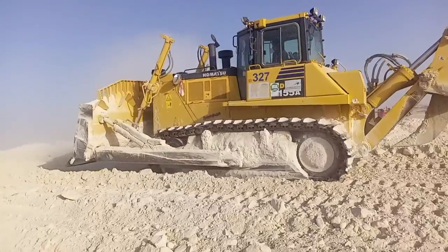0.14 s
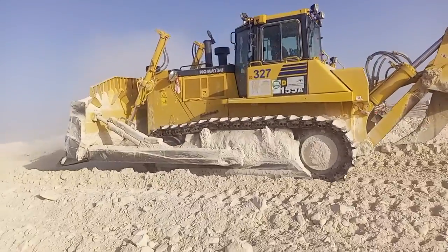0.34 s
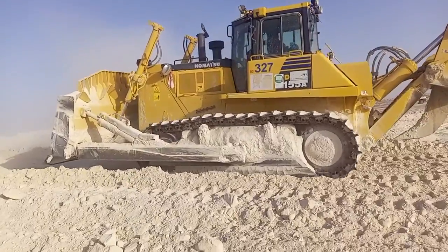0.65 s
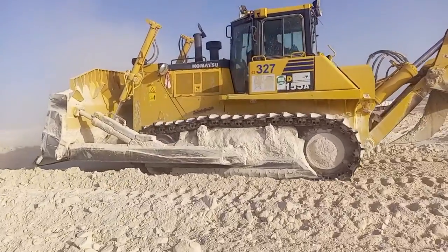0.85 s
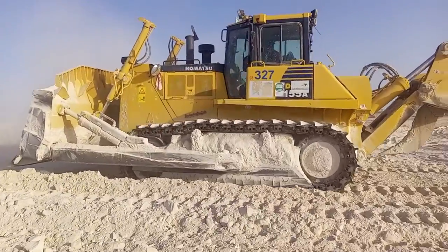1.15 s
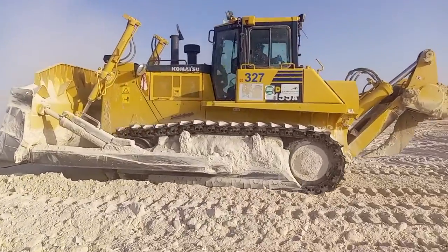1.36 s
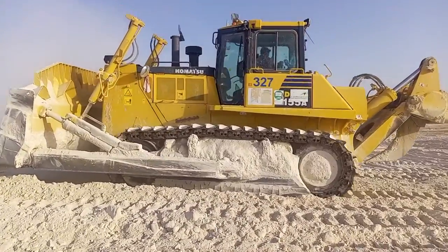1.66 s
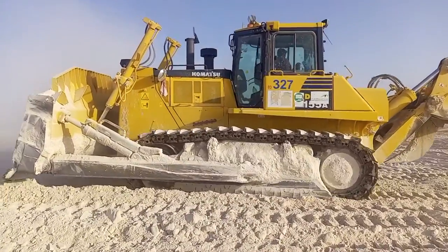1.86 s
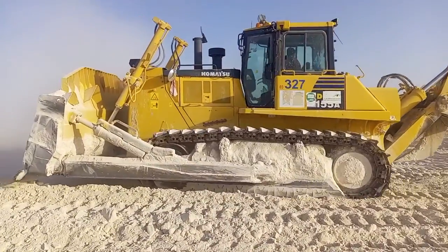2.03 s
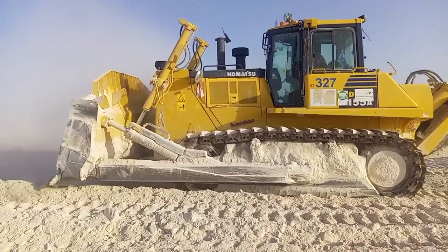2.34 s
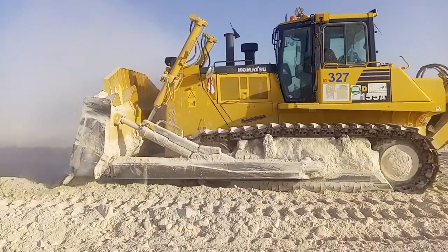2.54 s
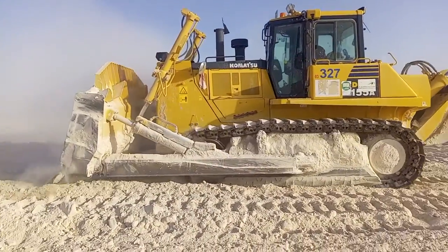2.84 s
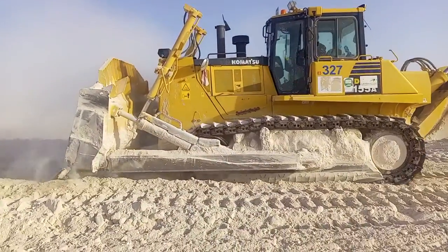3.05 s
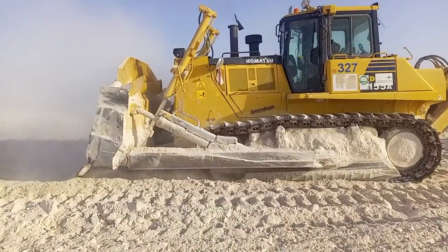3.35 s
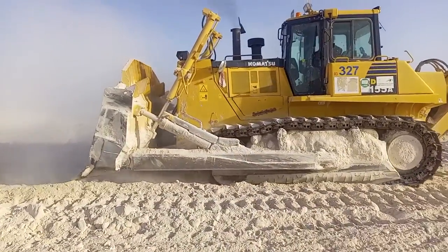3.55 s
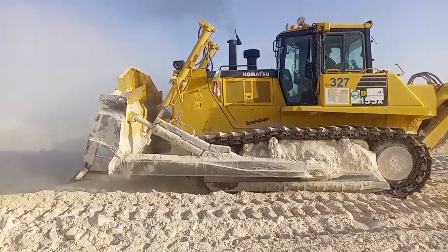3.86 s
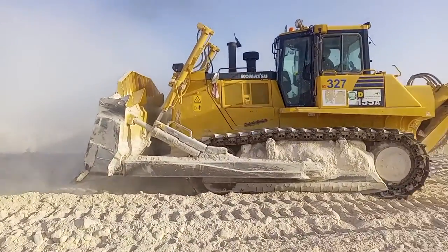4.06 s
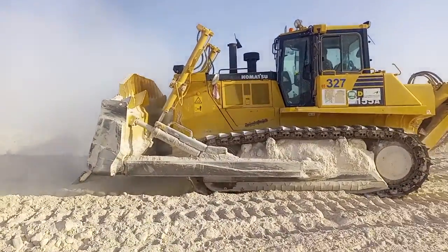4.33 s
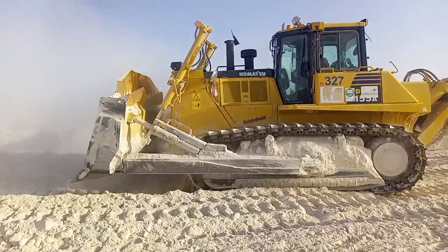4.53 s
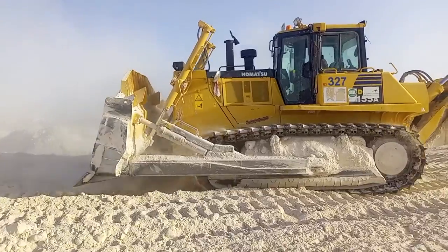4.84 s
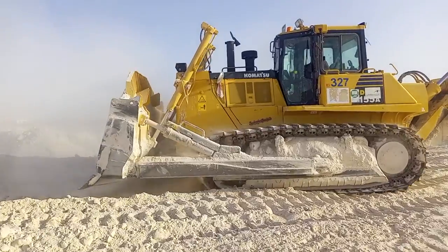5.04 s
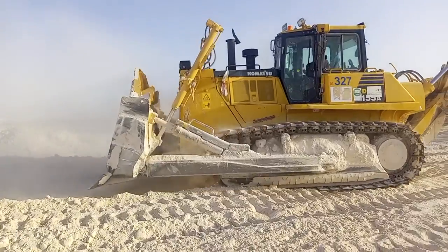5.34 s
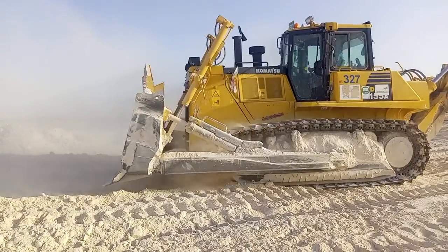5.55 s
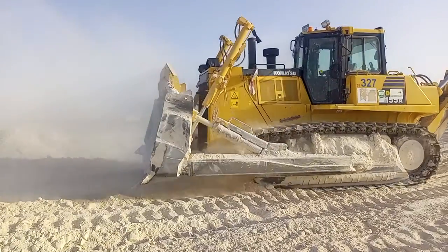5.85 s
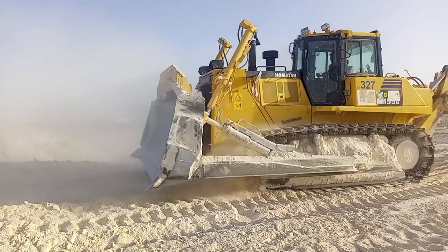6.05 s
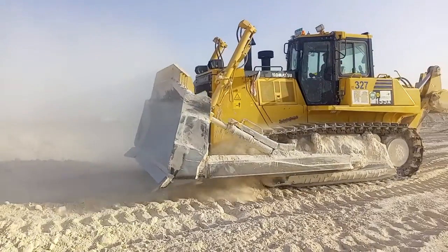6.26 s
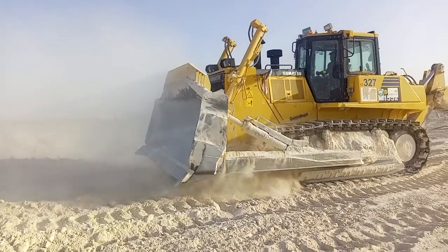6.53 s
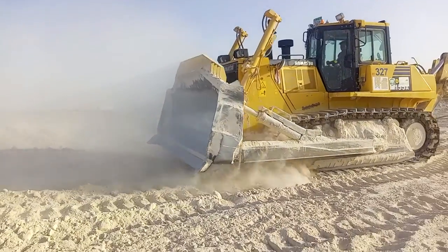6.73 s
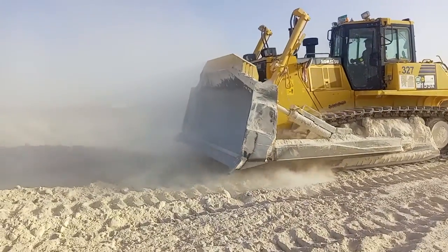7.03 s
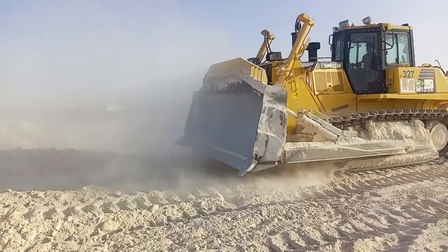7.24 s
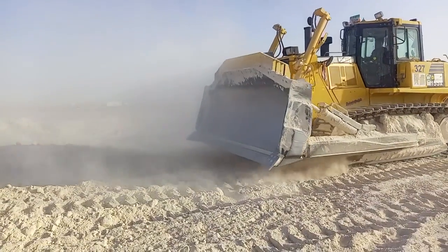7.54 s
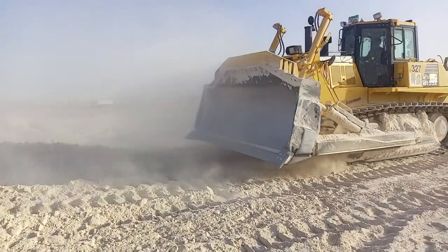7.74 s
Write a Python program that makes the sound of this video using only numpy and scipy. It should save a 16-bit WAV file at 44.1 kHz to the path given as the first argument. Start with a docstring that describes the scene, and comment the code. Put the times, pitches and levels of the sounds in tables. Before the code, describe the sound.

A bulldozer reverses nearby, steel tracks clanking and squeaking over a humming diesel engine, with some wind thumping the microphone.

```python
"""Steel track shoes clank and squeak over the sprocket as a bulldozer reverses on loose soil nearby.
Each shoe scrapes and rings; the track frame knocks, pins chirp as they slip and dry bearings squeal.
Underneath, grit grinds in the rollers, fan air and dust hiss, and the diesel hums and roars, its turbo
whistling once. Low thumps come from the tracks early on, from wind on the small microphone later."""
import sys
import numpy as np
from scipy import signal
from scipy.fft import rfft, irfft
from scipy.io import wavfile
from scipy.ndimage import uniform_filter1d

SR = 44100
rng = np.random.default_rng(int(sys.argv[2]) if len(sys.argv) > 2 else 0)


def file_out(sig):
    """Save sig as 16-bit WAV at sys.argv[1]."""
    # one column per channel
    cols = np.atleast_2d(sig).T
    # limit, then scale
    lim = np.clip(cols, -1, 1)
    pcm = np.round(lim * 32767).astype(np.int16)
    wavfile.write(sys.argv[1], SR, pcm)


N = 347949


def gain_of(db):
    return 10 ** (np.asarray(db) / 20)


def unit_rms(x):
    return x / np.sqrt(np.mean(x ** 2) + 1e-20)


def curves(rows, t):
    """Columns of a (time_s, value, ...) table, interpolated at t."""
    time_s, *columns = np.transpose(rows)
    return [np.interp(t, time_s, column) for column in columns]


def add(mix, start_s, sound):
    part = mix[max(round(start_s * SR), 0):][:len(sound)]
    part += sound[:len(part)]


def wander(size, width_hz):
    """Narrowband complex noise: wavering amplitude and phase."""
    pole, settle = np.exp(-np.pi * width_hz / SR), 2000
    white = rng.standard_normal((size + settle, 2)) @ [1, 1j]
    return signal.lfilter([1], np.poly([pole, pole]), white)[settle:] * (1 - pole) ** 1.5 * np.sqrt(2)


def tone(hz, size, width_hz, rough):
    """Sine, part steady and part wavering; rough (0-1) sets the blend."""
    carrier = np.exp(2j * np.pi * (np.cumsum(hz * np.ones(size)) / SR + rng.random()))
    return (carrier * (np.sqrt(1 - rough) + np.sqrt(rough) * wander(size, width_hz))).real


def envelope(t, hold_s, rise_s, t60_s):
    """Soft rise of at least 2 ms, hold, exponential fall."""
    attack = np.sin(np.pi / 2 * np.clip(t / max(rise_s, 0.002), 0, 1)) ** 2
    return attack * gain_of(-60 * np.maximum(t - rise_s - hold_s, 0) / t60_s)


def noise(magnitude, size, patchy_db):
    """Random short-time spectra of magnitude(hz, t), mottled by drifting patches."""
    hop = size // 4
    frames, hz = N // hop + 5, np.fft.rfftfreq(size, 1 / SR)
    real, imag, patches = rng.standard_normal((frames, len(hz), 3)).T
    patches = unit_rms(uniform_filter1d(uniform_filter1d(patches, size=3, axis=0), size=10, axis=1))
    mottle = gain_of(patchy_db * np.minimum(patches, 2))
    spectra = (real + 1j * imag) * mottle * magnitude(hz[:, None] + 1, np.arange(frames) * hop / SR)
    return signal.istft(spectra, nperseg=size, noverlap=size - hop)[1][:N]


def coloured(spectrum, patchy_db, size=1024):
    """Unit-RMS noise from (freq_hz, density_db) points."""
    freq_hz, density_db = np.transpose(spectrum)
    def magnitude(hz, t):
        return gain_of(np.interp(np.log(hz), np.log(freq_hz), density_db))
    return unit_rms(noise(magnitude, size, patchy_db))


def scraped(source, start_s, mode_hz, mode_db, width_hz, size):
    """A slice of source through steep resonances, at unit RMS."""
    detune = 2 * (np.fft.rfftfreq(size, 1 / SR) - mode_hz[:, None]) / width_hz[:, None]
    response = np.sum(gain_of(mode_db)[:, None] / (1 + detune ** 2), axis=0)
    force = np.resize(source[round(start_s * SR):], size)
    return unit_rms(irfft(rfft(force) * response, size))


def thump_spectrum(hz, thump_hz, rasp_db):
    """A low thump, a deep push below, a rasp above."""
    thump = 1 / (1 + (3.26 * np.log(hz / thump_hz)) ** 2) / (1 + (hz / 350) ** 4.1)
    push = 1 / (1 + (hz / 85) ** 21) / (1 + (55 / hz) ** 4.9)
    rasp = 1 / (1 + (250 / hz) ** 15) / (1 + (hz / 560) ** 4.38)
    bands = ((thump, 0), (push, -15), (rasp, rasp_db))
    return sum(gain_of(db) * band / np.linalg.norm(band) for band, db in bands)


# Low thumps (tracks before 4.5 s, wind after): crest_s, hold_s, level_db, thump_hz, rasp_db
LOW_THUMPS = [(0.145, 0.051, -38.5, 175, -9), (0.51, .08, -48.5, 115, 2), (0.975, 0.028, -38, 198, -10),
              (1.1, .2, -40, 116, -23), (1.366, .05, -34, 146, -6), (1.617, 0.011, -38.5, 170, -4),
              (1.996, 0.075, -33.5, 133, -34), (2.244, 0.08, -37.5, 222, -22), (2.5, 0.32, -50, 121, -18),
              (2.93, 0.031, -43, 123, -4), (3.11, .05, -38, 117, -13), (3.195, 0.049, -35, 150, -12.5),
              (4.324, .04, -41, 123, -20), (4.622, 0.065, -25.5, 128, -7), (4.706, 0.063, -29, 130, -29),
              (5.21, 0.051, -47, 190, -6), (5.301, .07, -28.5, 159, -11.5), (5.362, 0.054, -22, 208, -14.5),
              (5.492, 0.05, -23, 115, -5), (5.585, .03, -28, 121, -35), (5.644, .07, -30, 173, -48),
              (5.982, 0.025, -41, 166, -5), (6.08, 0.042, -41.5, 161, -27),
              (6.501, 0.047, -30.5, 173, -12.5), (6.585, 0.056, -30, 138, -7), (6.694, 0.028, -35, 135, -4),
              (6.763, 0.025, -29.5, 161, -8), (6.877, 0.087, -28, 145, -8.5), (7.0, 0.04, -21, 149, -22),
              (7.229, 0.042, -21, 135, -11), (7.29, 0.06, -38.5, 140, 0), (7.36, 0.033, -37.5, 170, -1),
              (7.481, 0.14, -30, 131, 0), (7.678, 0.055, -22.5, 146, -11.5), (7.805, 0.068, -22, 144, -7.5)]
def breeze_and_thumps(rise_s=0.033, fall_db_per_s=356):
    """A lumpy breeze under low thumps: from the tracks early on, from wind on the microphone later."""
    def magnitude(hz, t):
        lumps = unit_rms(uniform_filter1d(rng.standard_normal(len(t)), size=9))
        power = (gain_of(-54.5 + 3 * lumps) * thump_spectrum(hz, thump_hz=162, rasp_db=-6)) ** 2
        for crest_s, hold_s, level_db, thump_hz, rasp_db in LOW_THUMPS:
            swell = envelope(t - crest_s + rise_s, hold_s, rise_s, t60_s=60 / fall_db_per_s)
            power += (gain_of(level_db - 5) * swell * thump_spectrum(hz, thump_hz, rasp_db)) ** 2
        return np.sqrt(power)
    return noise(magnitude, size=1024, patchy_db=3)


# Hiss spectrum: freq_hz, density_db
HISS_SPECTRUM = [(2940, -40), (5000, -20), (5220, 0.5), (6600, -4.5), (8060, -12.5), (10700, -23.5),
                 (11500, -25), (13600, -20), (15100, -17), (16000, -12)]
# Hiss level: time_s, level_db
HISS_LEVEL = [(0.0, -77), (0.7, -64.5), (2.17, -66.5), (3.87, -59), (4.5, -65.5), (4.96, -60),
              (5.32, -67.5), (5.65, -60.5), (6.0, -60.5), (6.31, -61), (6.48, -69), (6.77, -64.5),
              (7.12, -67), (7.54, -71), (7.89, -61)]
def hiss(t):
    """Fan air and sliding dust: smooth high noise."""
    level_db, = curves(HISS_LEVEL, t)
    return gain_of(level_db + 5) * coloured(HISS_SPECTRUM, patchy_db=1.5, size=512)


# Turbo whistle: time_s, pitch_hz, level_db
TURBO = [(3.2, 7700, -73), (3.45, 8150, -70), (3.7, 9000, -69), (3.95, 9750, -68), (4.3, 9980, -69),
         (4.7, 9600, -70), (5.2, 8800, -73)]
def turbo(t, fade_s=0.089):
    """The turbo spools up and eases off once: a narrow gliding band of noise."""
    pitch_hz, level_db = curves(TURBO, t)
    fade = np.clip(np.minimum(t - TURBO[0][0], TURBO[-1][0] - t) / fade_s, 0, 1)
    return gain_of(level_db + 1.5) * fade * tone(pitch_hz, N, width_hz=200, rough=1)


# Cylinder firing: time_s, firing_hz, level_db, rough_fraction
FIRING = [(0, 84.5, -57, 0.8), (1.2, 87, -52.5, 0.93), (2.0, 87.64, -49.5, 0.6), (2.9, 86.8, -44.5, 0.76),
          (3.2, 84, -41.5, 0.5), (3.6, 87.5, -43, 0.5), (4.0, 95.8, -51.5, 0.6), (4.4, 97, -53.5, 0.8),
          (5.0, 91.6, -65, 0.5), (5.9, 77.74, -56, 0.91), (7.89, 78.8, -57, 0.6)]
# Exhaust spectrum: freq_hz, density_db
ROAR_SPECTRUM = [(18, -44), (30, -26), (81, 1), (190, 1.5), (373, 0), (467, -4), (584, -24), (717, -4),
                 (802, -2), (1140, -10), (1260, -7), (1380, -26.5), (1690, -8.5), (2120, -21.5),
                 (2600, -19.5), (3380, -76), (5720, -120)]
# Machine effort, for diesel and grind: time_s, roar_db, grind_db
EFFORT = [(0.0, -46, -40.5), (0.5, -45, -47), (1.16, -47.5, -52.5), (2.09, -46, -54), (2.26, -43, -53),
          (2.52, -47, -48), (3.07, -44.5, -48), (3.91, -48.5, -49), (4.44, -48.5, -51.5),
          (4.81, -48.5, -46.5), (5.1, -45, -48), (5.43, -49, -54), (5.67, -52.5, -39), (6.04, -50, -49.5),
          (6.79, -51, -53.5), (7.12, -50, -45.5), (7.67, -51.5, -45), (7.89, -52, -47.5)]
def diesel(t):
    """Firing tone and its octave, plus exhaust roar throbbing at the firing rate."""
    firing_hz, level_db, rough = curves(FIRING, t)
    roar_db, _ = curves(EFFORT, t)
    hum = sum(gain_of(db) * tone(harmonic * firing_hz, N, width_hz=22, rough=rough)
              for harmonic, db in ((1, 3), (2, -8)))
    throb = 1 + 0.038 * np.cos(2 * np.pi * np.cumsum(firing_hz) / SR)
    roar = gain_of(roar_db + 0.5) * throb * coloured(ROAR_SPECTRUM, patchy_db=5.5)
    return gain_of(level_db) * hum + roar


# Track grind spectrum: freq_hz, density_db
GRIND_SPECTRUM = [(880, -74), (1500, 4), (1740, 6), (2100, -3), (2770, -5), (3010, 4.5), (3580, 6),
                  (3980, 6.5), (4450, 7), (4830, 12.5), (5210, 4), (6620, -0.5), (9000, -18.5),
                  (11700, -46), (19800, -120)]
def grind(t):
    """Grit between pins and rollers excites the steel in short streaks."""
    _, grind_db = curves(EFFORT, t)
    return gain_of(grind_db - 5) * coloured(GRIND_SPECTRUM, patchy_db=5)


# Bearing squeals: start_s, end_s, pitch_hz, level_db
SQUEALS = [(0.0, 0.29, 1770, -55), (0.1, 0.272, 3150, -46.5), (0.07, 0.315, 4310, -47.5),
           (0.0, 0.297, 4600, -55), (0.065, 0.3, 5640, -66), (0.0, 0.253, 3580, -53),
           (1.416, 1.69, 6900, -48), (1.749, 2.325, 6770, -59.5), (1.788, 2.093, 1740, -47.5),
           (1.919, 2.103, 1250, -52.5), (2.403, 2.537, 4350, -49), (3.145, 3.46, 1578, -46.5),
           (3.739, 3.903, 6360, -67), (3.9, 4.288, 1747, -53), (5.048, 5.325, 1530, -54),
           (5.591, 5.913, 1456, -60), (7.082, 7.92, 1560, -51), (7.439, 7.838, 4720, -47.5)]
def bearing_squeals():
    """Dry bearings stick and slip on one narrow mode, fading in and out."""
    out = np.zeros(N)
    for start_s, end_s, pitch_hz, level_db in SQUEALS:
        size = round((end_s - start_s) * SR)
        squeal = tone(pitch_hz, size, width_hz=55, rough=0.46)
        add(out, start_s, gain_of(level_db) * squeal * signal.windows.tukey(size, 0.4))
    return out


# Pin slips: time_s, level_db, pitch_hz
CHIRPS = [(.345, -40.5, 10200), (0.5591, -38, 7360), (.597, -47, 11600), (.627, -40, 9300),
          (1.0, -51, 9270), (1.062, -34.5, 7260), (1.235, -60, 9200), (1.285, -56, 9300), (1.49, -51, 9160),
          (1.5871, -13, 7380), (1.8519, -24.5, 8230), (2.1076, -29.5, 7070), (2.3526, -24, 7400),
          (2.38, -27, 7330), (2.5321, -22, 7130), (2.583, -30, 7530), (2.651, -28, 7350),
          (2.8045, -29.5, 8700), (2.847, -33, 8710), (3.043, -29, 8210), (3.2031, -24, 7240),
          (3.3403, -32, 7350), (3.5197, -30, 7000), (4.1106, -39, 7600), (4.464, -29.5, 9220),
          (4.7212, -37, 8180), (4.923, -31, 8070), (4.998, -26.5, 8230), (5.1577, -23.5, 7630),
          (5.318, -34, 7540), (5.4667, -31.5, 8050), (5.639, -23.5, 7220), (5.994, -28, 8020),
          (6.1235, -33, 7800), (6.1626, -21.5, 7800), (6.2726, -39, 7100), (6.4732, -42, 7690),
          (6.665, -36, 7480), (6.79, -36, 15550), (6.92, -53, 11400), (7, -30.5, 8200), (7.095, -43, 10300),
          (7.1096, -34.5, 7840), (7.457, -35, 8120), (7.4829, -29, 8280), (7.6829, -29.5, 7770)]
def pin_chirps(ticks_per_s=12):
    """A slipping track pin briefly rings one high mode; faint random slips tick in between."""
    out, t = np.zeros(N), np.arange(3000) / SR
    ticks = [(when * N / SR, -51 + 8 * force, np.interp(pitch ** 2, (0, 1), (7000, 11890)))
             for when, force, pitch in rng.random((round(ticks_per_s * N / SR), 3))]
    slip = envelope(t, hold_s=0.0054, rise_s=0.0075, t60_s=0.035)
    for time_s, level_db, pitch_hz in CHIRPS + ticks:
        ring = tone(pitch_hz, len(t), width_hz=130, rough=0.64)
        add(out, time_s - 0.005, gain_of(level_db - 7) * slip * ring)
    return out


# Track frame knocks: time_s, level_db, pitch_hz, hold_s
FRAME_KNOCKS = [(0.002, -28.5, 856, 0.009), (0.119, -22, 863, 0.023), (0.189, -23.5, 859, 0.03),
                (0.365, -25.5, 849, 0.025), (0.476, -37, 814, 0.011), (0.596, -30, 884, 0.022),
                (0.719, -29, 856, 0.019), (0.835, -38, 900, 0.022), (0.966, -26.5, 879, 0.0074),
                (1.09, -32.5, 902, 0.015), (1.215, -39, 854, 0.017), (1.344, -42, 868, 0.017),
                (1.465, -34, 913, 0.011), (1.6, -31, 864, 0.0081), (1.727, -37, 863, 0.01),
                (1.865, -42, 1038, 0.03), (1.995, -37.5, 917, 0.014), (2.135, -29, 890, 0.027),
                (2.24, -30.5, 838, 0.066), (2.336, -31.5, 885, 0.026), (2.406, -31, 830, 0.027),
                (2.455, -45, 940, 0.015), (2.565, -34.5, 854, 0.024), (2.68, -33, 738, 0.048),
                (2.752, -33.5, 707, 0.012), (2.825, -40.5, 706, 0.015), (2.927, -30, 875, 0.018),
                (3.014, -40, 746, 0.026), (3.231, -38, 849, 0.037), (3.295, -35, 799, 0.02),
                (3.428, -34.5, 861, 0.017), (4.157, -46, 708, 0.015), (4.57, -35, 866, 0.05),
                (4.753, -31.5, 875, 0.025), (4.814, -40, 830, 0.037), (4.889, -36, 846, 0.047),
                (5.173, -40, 773, 0.017), (5.501, -30, 617, 0.022), (5.666, -31.5, 886, 0.016),
                (5.828, -34.5, 888, 0.027), (5.92, -44, 904, 0.019), (6.178, -38.5, 790, 0.037),
                (6.275, -38, 931, 0.03), (6.511, -39, 851, 0.034), (6.688, -40, 967, 0.014),
                (7.221, -39, 770, 0.027), (7.756, -32, 591, 0.034), (7.838, -34.5, 654, 0.017)]
# Low steel knocks and the lower rings of shoe clanks: time_s, level_db, pitch_hz, hold_s
LOW_RINGS = [(.355, -39, 1850, 0.0062), (1.341, -35.5, 1625, 0.0082), (2.095, -30, 330, 0.038),
             (2.242, -28, 336, 0.041), (2.249, -36.5, 1100, 0.028), (2.369, -28, 332, 0.03),
             (2.415, -34, 310, 0.018), (2.526, -24.5, 2130, 0.01), (2.949, -41, 1290, 0.02),
             (3.104, -33, 414, 0.016), (3.115, -35, 1278, 0.016), (3.517, -40, 2510, 0.0071),
             (5.556, -47, 2340, .011), (5.831, -38, 2430, 0.004), (7.164, -42, 2610, 0.018),
             (7.871, -35, 2420, .018)]
def knocks(rows, grit, rise_s, t60_s, width_hz, rough):
    """Heavy steel rings on one low mode and two weaker neighbours, with a short clack on top."""
    out, t = np.zeros(N), np.arange(6500) / SR
    clack_ratios, clack_db = np.array([1.45, 1.95, 2.6, 3.6]), [2.5, -5, -17.5, -2]
    for time_s, level_db, pitch_hz, hold_s in rows:
        ring = sum(gain_of(db) * tone(ratio * pitch_hz, len(t), width_hz, rough)
                   for ratio, db in ((1, 4), (0.85, -8.5), (1.18, -14.5)))
        ring *= gain_of(level_db - 7) * envelope(t, hold_s, rise_s, t60_s)
        clack = scraped(grit, time_s, pitch_hz * clack_ratios, clack_db,
                        width_hz=np.full(4, 1.2 * pitch_hz), size=len(t))
        clack *= gain_of(-40 + 0.3 * level_db) * envelope(t, 0.01, 0.0013, t60_s=0.092)
        add(out, time_s - 0.003, ring + clack)
    return out


def rattles(rate_per_s=4):
    """Weak shoe clanks at random times, as rows like CLANKS."""
    return [(when * N / SR, -34 - 4 * soft, 3600 + 1400 * low, -12,
             5600 + 2600 * high, -20, 15200, -24, 0.016)
            for when, soft, low, high in rng.random((round(rate_per_s * N / SR), 4))]


# Track shoe modes: pitch_hz, width_hz, level_db
SHOE_MODES = [(1702, 28.4, -44), (1800, 40, -22), (2420, 26, 9), (3100, 220, 10.5), (4040, 106, 18.5),
              (4910, 110, 13.5), (5600, 55, 6), (6310, 100, 12.5), (6480, 56, 5), (7520, 55, 7),
              (8060, 42, 12.5), (9020, 110, -67), (8980, 69, -24), (8700, 14, -26), (10080, 27, -9),
              (10610, 14, -57.5), (9950, 8.1, -49), (11200, 73, -11), (11520, 66, -1.5), (11800, 55, -14),
              (14000, 42, -51), (15000, 290, 3), (14400, 300, -35)]
def shoe_crunch(grit, time_s, ring_hz, ring_db, size):
    """Grit drives all modes of a shoe, hardest near its rings; each shoe is tuned a little differently."""
    pitch_hz, width_hz, level_db = np.transpose(SHOE_MODES)
    mode_hz = pitch_hz * (1 + 0.02 * rng.standard_normal(len(pitch_hz)))
    mode_db = 0.71 * level_db + 0.87 * np.interp(mode_hz, ring_hz, ring_db)
    mode_db += 4 * np.clip(rng.standard_normal(len(mode_hz)), -2, 1.5)
    damped_width_hz = 1.5 * width_hz + 260  # packed soil widens each mode
    return gain_of(-6) * scraped(grit, time_s / 2, mode_hz, mode_db, damped_width_hz, size)


# Shoe strikes and their rings (ring levels relative to level_db):
# time_s, level_db, low_hz, low_db, high_hz, high_db, top_hz, top_db, scrape_s
CLANKS = [(0.0662, -37.5, 4720, 3.5, 5470, -29, 14800, -46, 0.011),
          (0.107, -38, 4370, 1, 5850, -29, 15100, -32, 0.017),
          (0.176, -32.5, 3240, -3.5, 5700, -13, 11800, -40, 0.02),
          (0.21, -20, 4790, -15, 5670, -37, 15300, -45, 0.0091),
          (0.263, -41, 4740, -4, 5430, -26, 14600, -32, 0.011),
          (0.348, -28.5, 4340, -13, 5500, -33, 11400, -25, 0.0075),
          (0.4306, -41, 3520, 4.5, 5680, -33, 11800, -10, 0.01),
          (0.508, -34.5, 4920, -15, 6450, -29, 9300, -34, 0.012),
          (0.702, -28.5, 4940, -6, 5660, -16, 15100, -24, 0.0096),
          (0.8056, -36, 4780, 1.5, 5530, -27, 14500, -22, 0.019),
          (0.9431, -24, 4050, 6, 6440, -21, 12700, -19, 0.0047),
          (1.0605, -41.5, 5300, -16, 7370, -3, 15200, -29, 0.011),
          (1.083, -42, 4180, -16, 6230, -5, 9880, -35, 0.014),
          (1.2066, -34, 4890, 0, 5560, -16, 9410, -28, 0.016),
          (1.325, -35, 4120, -23, 8060, -23, 15600, -18, 0.014),
          (1.338, -28.5, 4820, -8.5, 6590, -17, 10100, -38, 0.015),
          (1.591, -18, 5400, -12.5, 7560, -6.5, 9380, -38, 0.011),
          (1.851, -25.5, 5030, -21, 8230, -23, 11600, -22, 0.01),
          (1.9886, -34.5, 4220, -8, 6220, -6, 11800, -8, 0.0091),
          (2.008, -30.5, 4100, 4, 6620, -18, 11700, -40, 0.0065),
          (2.1068, -23, 5340, -13.5, 7080, -12, 11800, -10.5, 0.022),
          (2.249, -28, 4800, -19, 5900, -11, 11900, -17, 0.019),
          (2.3483, -13, 4620, -15, 6300, -11, 11500, -19, 0.0063),
          (2.381, -11.5, 4790, -26, 6340, -12.5, 9870, -26, 0.011),
          (2.5256, -12, 4090, -16, 6375, -6.5, 11100, -34, 0.013),
          (2.579, -33.5, 3840, -30, 7300, -2, 11900, 3, 0.0053),
          (2.6549, -19.5, 3740, -24, 6520, -1.5, 14200, -19, 0.013),
          (2.7693, -37, 4130, -2, 6440, 0.5, 11200, -23, 0.019),
          (2.7945, -19.5, 5000, 3, 5710, -11, 11300, -26, 0.014),
          (2.8413, -21.5, 5060, -4, 6300, -15, 15000, -35, 0.012),
          (2.958, -33, 4000, -2, 6240, -11, 10700, -35, 0.033),
          (3.038, -34, 4820, -20, 8130, -22, 11100, -31, 0.012),
          (3.0709, -27.5, 4940, -8.5, 7270, -9, 11800, -23, 0.011),
          (3.1168, -38, 4920, -9, 6420, -22, 11500, -8, 0.016),
          (3.163, -26, 4030, -1, 5760, -16, 15300, -32, 0.021),
          (3.2031, -27, 3790, -5, 7260, -9, 15600, -28, 0.0082),
          (3.228, -27.5, 3950, -5, 7380, -14, 11300, -19, 0.0073),
          (3.3126, -36.5, 4910, 0, 5340, -8, 11200, -16, 0.017),
          (3.387, -33, 4850, 7.5, 5780, -24, 9780, -24, 0.018),
          (3.5185, -30, 3600, -5, 5640, -13, 11900, -17, 0.011),
          (3.597, -34, 3960, -2, 6570, -20, 15200, -24, 0.011),
          (3.634, -34.5, 3940, -4.5, 5500, -13, 15600, -24, 0.011),
          (3.803, -37, 3830, 6, 6270, -2.5, 15200, -34, 0.033),
          (3.86, -38.5, 3780, -8, 6410, -10, 11900, -11, 0.014),
          (3.898, -37, 4450, -5, 5370, -18, 9700, -17, 0.012),
          (4.0673, -28.5, 5000, 1, 5610, -19, 9810, -22, 0.033),
          (4.102, -22.5, 5060, 4, 5850, -7, 11600, -15, 0.015),
          (4.357, -24.5, 3920, -10.5, 5660, -18.5, 15100, -42, 0.019),
          (4.5084, -22.5, 5000, 5, 6400, -17.5, 10100, -31, 0.0094),
          (4.5516, -21, 4930, -22, 6010, -12, 15000, -35, 0.0081),
          (4.7192, -28.5, 3420, -1.5, 5960, -9.5, 9550, -28, 0.014),
          (4.8703, -32, 4930, -18, 6120, -17, 10100, -27, 0.02),
          (4.922, -34.5, 4100, 1, 7940, -17, 11800, -27, 0.014),
          (4.9803, -26.5, 5110, -5, 5576, 0.5, 11700, -37, 0.014),
          (5.1564, -20.5, 4970, -15, 5980, -8.5, 9520, -44, 0.0083),
          (5.316, -27.5, 2710, -24, 6000, -10, 9430, -32, 0.02),
          (5.471, -23, 3600, -12, 6190, -16, 9340, -30.5, 0.026),
          (5.5822, -31.5, 3690, -13, 5800, -9, 9350, -23, 0.018),
          (5.6435, -16.5, 4670, -9, 6510, -15, 9340, -27, 0.023),
          (5.7225, -26, 3880, -4, 5760, -6, 15300, -44, 0.018),
          (5.744, -22, 4690, -5, 8900, -17, 12000, -39, 0.018),
          (5.8215, -22, 4150, -18, 6760, -28, 15100, -66, 0.02),
          (5.953, -34, 3880, -34, 7020, -6, 14900, -26, 0.017),
          (5.984, -25, 5030, -17, 5880, -5, 15400, -35, 0.015),
          (6.0072, -28, 4890, 7, 6470, -2.5, 11700, -42, 0.012),
          (6.127, -28.5, 4960, -11, 7010, -10, 14500, -30, 0.027),
          (6.166, -30, 3800, -3, 7470, -11, 10100, -40, 0.011),
          (6.237, -24, 3980, -3, 7470, -21, 11700, -20, 0.014),
          (6.2743, -22, 4070, -4.5, 7100, -15, 15300, -35, 0.026),
          (6.4055, -27.5, 4720, -21, 6370, -0.5, 9810, -28, 0.0088),
          (6.472, -36, 4370, -13, 7870, -13, 14800, -32, 0.013),
          (6.499, -32, 4790, -17, 6000, -12, 14900, -29, 0.0077),
          (6.6593, -23, 4430, -13, 7600, -14, 10100, -27, 0.012),
          (6.8315, -27.5, 4060, -17, 5400, -22, 15600, -46, 0.012),
          (6.946, -32.5, 4720, -13, 5650, -15, 9350, -16, 0.017),
          (7.0, -31, 4500, -9, 8200, -20, 15600, -39, 0.0093),
          (7.107, -34, 3580, -20, 7860, 4, 15500, -20, 0.0085),
          (7.134, -35.5, 3770, -1.5, 7940, -0.5, 15600, -35, 0.019),
          (7.1586, -19.5, 4450, -11, 7900, -25, 15600, -54, 0.014),
          (7.27, -38, 4540, -3, 5600, -6, 15600, -11, 0.014),
          (7.3183, -23.5, 2730, -7.5, 5830, -20, 10100, -32, 0.026),
          (7.46, -34.5, 4640, -7, 8250, -7, 15300, -37, 0.017),
          (7.485, -27.5, 3800, -6, 8140, -14, 15400, -42, 0.018),
          (7.5045, -17.5, 4800, -16, 6060, -31, 15700, -65, 0.011),
          (7.5623, -32, 4710, 3.5, 5620, -11, 15700, -52, 0.021),
          (7.6824, -36, 4850, -8, 7770, -18, 15400, -23, 0.014),
          (7.841, -36, 2660, -1.5, 5660, -8.5, 15500, -23, 0.014),
          (7.8695, -25.5, 3860, -12.5, 5640, -11, 15500, -41, 0.013)]
def shoe_clanks(grit):
    """A shoe hits the sprocket: four rings, part clean and part roughened by grit, over a crunch."""
    out, t = np.zeros(N), np.arange(6000) / SR
    for strike in CLANKS + rattles():
        time_s, level_db, low_hz, low_db, high_hz, high_db, top_hz, top_db, scrape_s = strike
        rise_s = 0.0065 + 0.15 * scrape_s  # longer scrapes start more softly
        body_hz = rng.uniform(1251, 2524)
        ring_hz = np.array([body_hz, low_hz, high_hz, top_hz])
        ring_db = np.array([-30, low_db, high_db, top_db]) + 7.5
        delay_s = 0.057 * scrape_s * rng.random((4, 1))
        sines = np.sin(2 * np.pi * (ring_hz[:, None] * t + rng.random((4, 1))))
        sines *= envelope(t - delay_s, 0.8 * scrape_s, rise_s, t60_s=0.018)
        clean = np.sum(gain_of(ring_db - 4.5)[:, None] * sines, axis=0)
        width_hz = np.where(ring_hz > 13500, 900, 90)  # broad sizzle at the very top
        gritty = scraped(grit, time_s, ring_hz, ring_db, width_hz, len(t))
        gritty *= np.linalg.norm(gain_of(ring_db - 8.5))
        crunch = shoe_crunch(grit, time_s, ring_hz, ring_db, len(t))
        hit = clean + gritty * envelope(t, scrape_s, rise_s, t60_s=0.08)
        hit += crunch * envelope(t, 1.69 * scrape_s, 0.65 * rise_s, t60_s=0.078)
        # the shoe already grinds as it slides towards the hit
        slide = (crunch + 1.1 * gritty) * envelope(t, hold_s=0, rise_s=0.036, t60_s=0.011)
        add(out, time_s - 0.022, gain_of(level_db - 21.5) * slide)
        add(out, time_s - 0.5 * rise_s, gain_of(level_db - 9) * hit)
    return out


def scene():
    t = np.arange(N) / SR
    grit = coloured([(100, 0), (20000, 0)], patchy_db=9.5, size=512)  # clumpy white noise
    frame = knocks(FRAME_KNOCKS, grit, rise_s=0.0054, t60_s=0.13, width_hz=67, rough=0.77)
    low_rings = knocks(LOW_RINGS, grit, rise_s=0.004, t60_s=0.098, width_hz=33, rough=0.92)
    tracks = shoe_clanks(grit) + frame + low_rings + pin_chirps() + bearing_squeals()
    return (tracks + diesel(t) + turbo(t) + grind(t) + hiss(t) + breeze_and_thumps())[None]


def record(dry, low_hz=55, high_hz=15900):
    """The microphone's bass roll-off, then a steep treble limit."""
    thin = signal.sosfilt(signal.butter(3, low_hz, "high", fs=SR, output="sos"), dry)
    lowpass = signal.firwin(511, high_hz, window=("kaiser", 9), fs=SR)
    return signal.oaconvolve(thin, lowpass[None], "same")


dry = scene()
out = record(dry)
file_out(out)
```